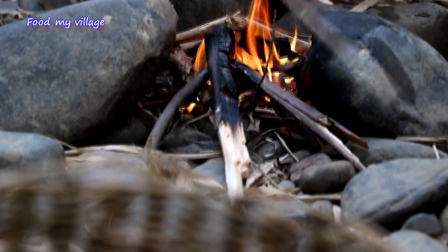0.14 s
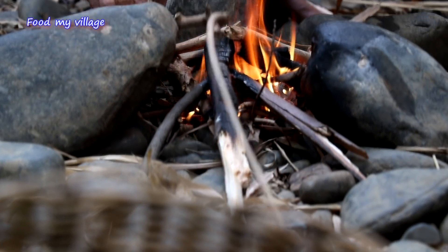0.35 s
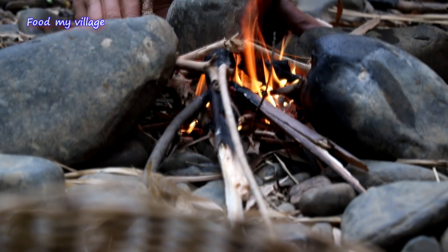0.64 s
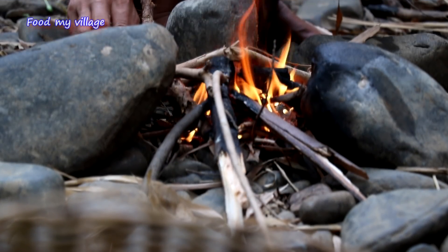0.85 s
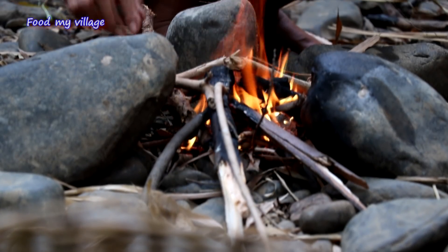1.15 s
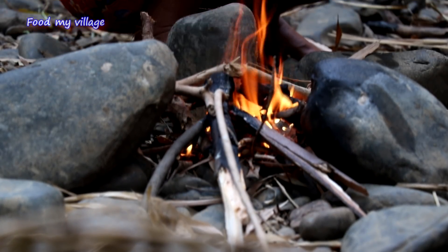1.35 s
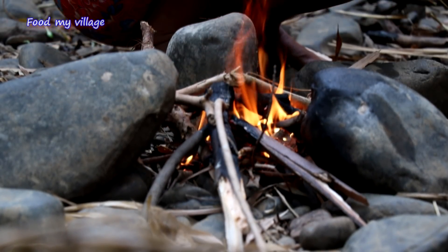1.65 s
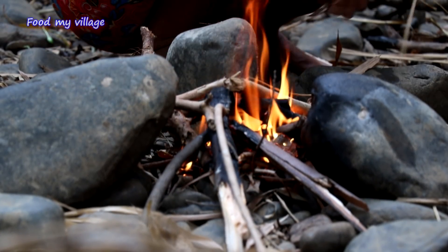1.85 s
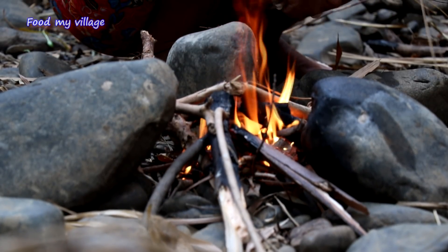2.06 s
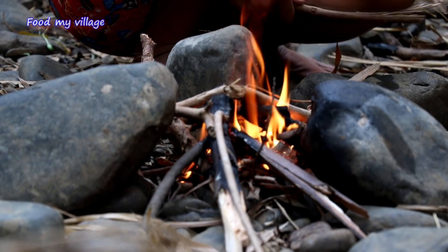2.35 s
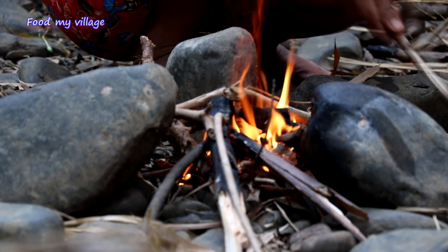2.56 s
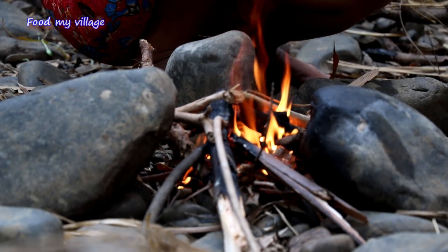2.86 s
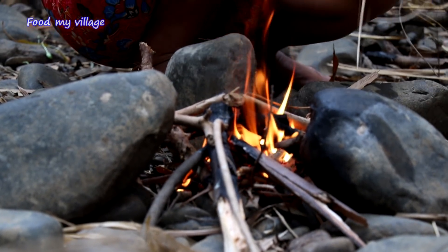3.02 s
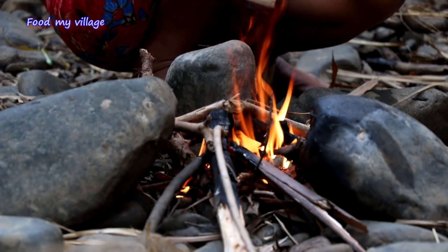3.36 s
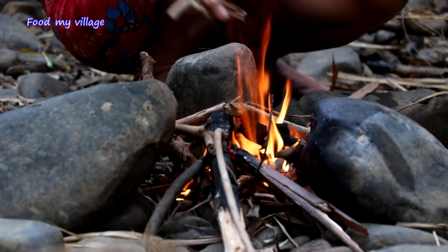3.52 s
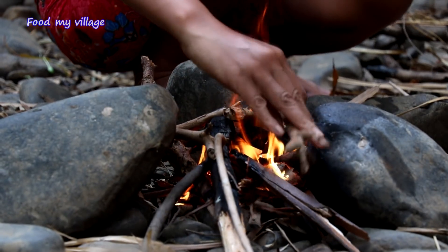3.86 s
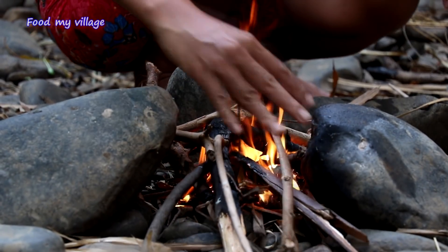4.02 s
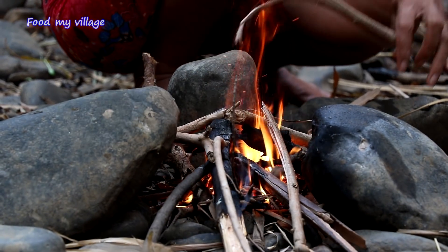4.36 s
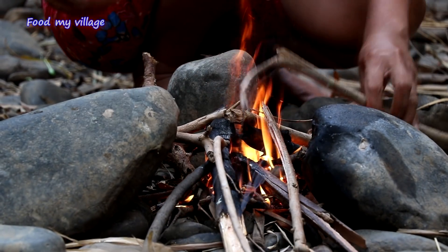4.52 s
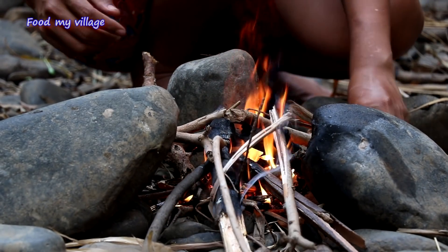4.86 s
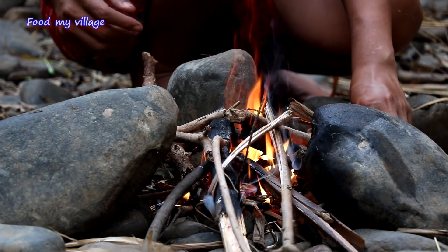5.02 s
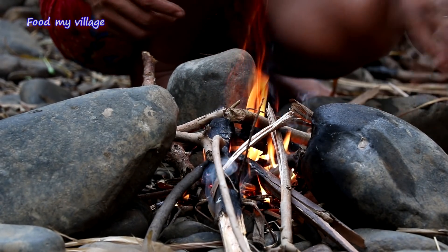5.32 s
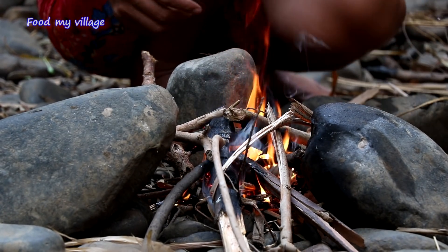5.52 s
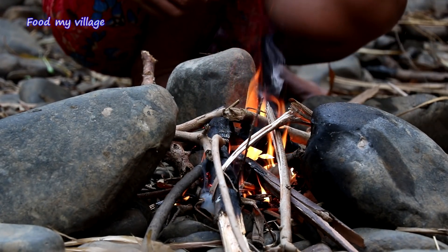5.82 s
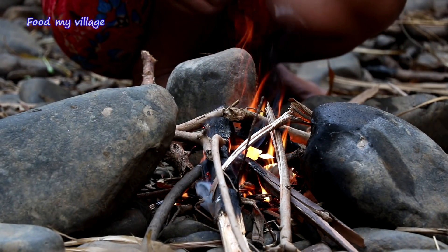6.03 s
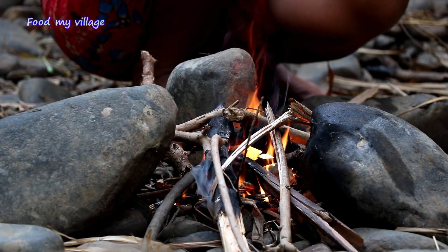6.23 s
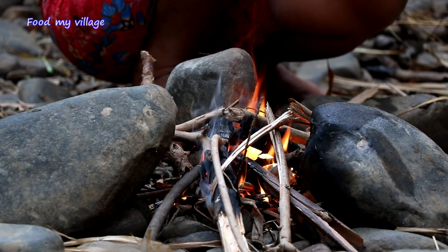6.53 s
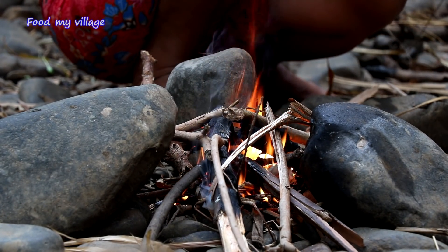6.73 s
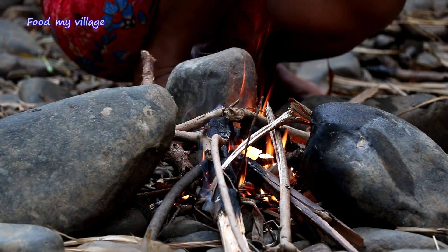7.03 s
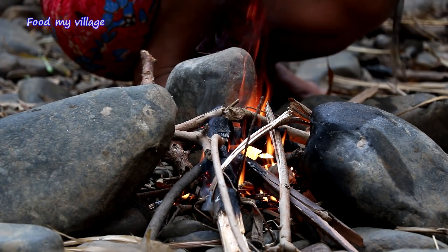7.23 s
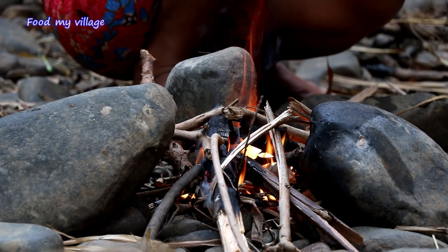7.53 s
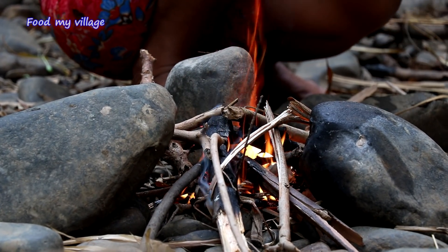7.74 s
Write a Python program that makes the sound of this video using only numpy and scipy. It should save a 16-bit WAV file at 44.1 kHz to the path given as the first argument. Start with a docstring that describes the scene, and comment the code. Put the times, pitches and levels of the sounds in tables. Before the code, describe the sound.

Outdoors, shrill cicadas and a faint, far engine hum lie behind a close little wood fire that fizzes and ticks. Loud sharp pops burst just after two seconds, followed by brief steamy spits. The cicadas dip in pitch and recover while sticks are laid on with soft knocks, and a distant bird gives a few faint notes. Another quick cluster of loud pops comes near the end, with more light wooden taps.

```python
"""A small stick fire burns close by between stones, outdoors. From the start sap fizzes, embers tick and
sticks knock softly, over droning cicadas and a far engine. Just after 2 s sap pockets burst with loud
pops, each ringing the wood and spraying steam; a distant bird calls, and again near 3 s and 5.4 s.
The cicadas sag in pitch from 2.6 s and recover by about 5 s. Near 7 s comes a second cluster of pops,
and more sticks are laid on."""
import sys
import numpy as np
from scipy import signal
from scipy.fft import rfft, irfft
from scipy.io import wavfile
from scipy.ndimage import uniform_filter1d, minimum_filter1d

SR = 44100
rng = np.random.default_rng(int(sys.argv[2]) if len(sys.argv) > 2 else 0)


def master_out(mix):
    """Clip the mix to full scale and print it as 16-bit PCM to the path in sys.argv[1]."""
    frames = np.transpose(np.atleast_2d(mix))
    ceiling = np.clip(frames, -1, 1)
    pcm = np.round(ceiling * 32767).astype(np.int16)
    wavfile.write(sys.argv[1], SR, pcm)


N = 347508
TIME = np.arange(N) / SR
HIT_SIZE = 8192  # samples in one impact

# sticks knocking together: start_s, level_db, brightness_db_per_octave, pitch_ratio
STICK_KNOCKS = [(0.089, -46, 0, 0.95), (.426, -49.5, 3.5, 0.84), (3.818, -48.5, -3.5, 0.8),
                (4.0225, -37.5, 2, 0.97), (4.707, -53, -2, 0.88), (6.42, -50.5, 0, 1.06),
                (6.938, -44, 9, .83), (7.091, -39.5, 5, 1.04), (7.167, -43, 7.5, 1.28),
                (7.419, -51, -3, 1.04)]


def undb(db):
    """Amplitude ratio of a level in decibels."""
    return 10 ** (np.asarray(db) / 20)


def unit(x):
    """Normalisation to rms 1."""
    return x / np.sqrt(np.mean(x ** 2))


def freqs(size):
    """Frequencies of a discrete spectrum, kept above zero."""
    return np.maximum(np.fft.rfftfreq(size, 1 / SR), 1)


def contour(points, size):
    """Magnitude response interpolated through (frequency_hz, level_db) points."""
    hz, db = np.transpose(points)
    return undb(np.interp(np.log(freqs(size)), np.log(hz), db))


def ringing(modes, pitch=1):
    """Modal response: damped resonances (centre_hz, width_hz, level_db) add in power."""
    f = freqs(HIT_SIZE)
    return np.sqrt(sum(undb(db) ** 2 / (1 + ((f * f - (hz * pitch) ** 2) / (f * width)) ** 2)
                       for hz, width, db in modes))


def colour(x, gain):
    """Minimum-phase filter: by causality it rings only after a blow."""
    cepstrum = irfft(np.log(gain + 1e-9), len(x))
    cepstrum[1:len(x) // 2] *= 2
    cepstrum[len(x) // 2 + 1:] = 0
    return irfft(rfft(x) * np.exp(rfft(cepstrum)), len(x))


def add(track, s, sound):
    """Superposition of a sound starting at s seconds."""
    start = max(int(s * SR), 0)
    track[start:start + len(sound)] += sound[:max(N - start, 0)]


def ease(start_s, takes_s):
    """Raised-cosine glide from 0 to 1."""
    return .5 - .5 * np.cos(np.pi * np.clip((TIME - start_s) / takes_s, 0, 1))


def narrow(width_hz, cycles=0, size=N):
    """Narrowband noise: a random envelope on a carrier of phase `cycles`; with none, a random drift."""
    bell = np.exp(-np.pi / 2 * (np.fft.fftfreq(N, 1 / SR) / width_hz) ** 2)
    envelope = np.fft.ifft(bell * (rng.standard_normal(N) + 1j * rng.standard_normal(N)))
    envelope *= np.sqrt(2 / np.mean(np.abs(envelope) ** 2))
    return (envelope[:size] * np.exp(2j * np.pi * cycles)).real


def hit(body, db, bright_db, ms):
    """Impulsive excitation: a broadband burst rings a body; db is its energy as if packed into 1 ms."""
    fade = np.exp(-np.arange(HIT_SIZE) / (SR * ms / 1000))
    phases = np.angle(rfft(rng.standard_normal(HIT_SIZE) * fade))
    burst = irfft(np.exp(1j * phases)) * np.sqrt(fade)
    octaves = np.log2(np.maximum(freqs(HIT_SIZE), 400))
    sound = colour(burst, body * undb(bright_db * (octaves - octaves.mean())))
    return sound * undb(db) * np.sqrt(SR / 1000 / np.sum(sound ** 2))


def reflect(x, first_ms, last_ms, db, count=10):
    """Early reflections: delayed copies, the later ones weaker, interfere with the direct sound."""
    out = x.copy()
    for k, chance in enumerate(rng.random(count)):
        ms = first_ms + (last_ms - first_ms) * (k + chance) / count
        add(out, ms / 1000, x * (-1) ** k * undb(db) * np.sqrt(first_ms / ms))
    return out


def tail(x, spectrum, t60_s, rise_s):
    """Diffuse decay: convolution with noise that builds up briefly and dies away exponentially."""
    t = TIME[:SR]
    response = rng.standard_normal(SR) * undb(-60 * t / t60_s) * (1 - np.exp(-t / rise_s))
    response = colour(response / np.sqrt(np.sum(response ** 2)), contour(spectrum, SR))
    return signal.fftconvolve(x, response)[:N]


def air(flutter_db=2.5, bands=16):
    """Ambient noise: a stereo hush whose middle bands flutter by independent amplitude modulation."""
    # open air, common to both channels: frequency_hz, density_db_per_hz
    mid_spectrum = [(12, -86.5), (22, -93), (60, -100), (150, -102), (260, -104), (500, -107.5),
                    (1000, -108), (2500, -111), (4000, -110), (9300, -111), (10500, -113.5), (15500, -116)]
    # the part that differs between left and right: frequency_hz, density_db_per_hz
    side_spectrum = [(15, -101.5), (80, -107), (500, -112), (2000, -116), (7000, -119), (14000, -116.5)]
    mid, side = (colour(rng.standard_normal(N), contour(points, N)) * np.sqrt(SR / 2)
                 for points in (mid_spectrum, side_spectrum))
    edges_hz = np.geomspace(200, 4400, bands + 1)
    f, spectrum = freqs(N), rfft(mid)
    for low, high in zip(edges_hz, edges_hz[1:]):
        band = irfft(spectrum * (f >= low) * (f < high), N)
        mid += band * (undb(flutter_db * narrow(16)) - 1)
    return np.array([mid + side, mid - side])


def engine(firing_hz=14.67):
    """Periodic firings make a harmonic series; only low harmonics carry this far, scrambled in phase."""
    # distant engine: harmonic_number, level_db
    harmonics = [(2, -89), (3, -99.5), (4, -80.5), (5, -80.5), (6, -90), (7, -88.5), (8, -78), (9, -86),
                 (10, -77.5), (11, -80), (12, -95), (15, -88.5)]
    phase = 2 * np.pi * firing_hz * TIME + .03 * narrow(2)
    return np.sqrt(2) * sum(undb(db) * np.cos(k * phase + rng.standard_normal()) for k, db in harmonics)


def bird():
    """Frequency-modulated noise: hoarse notes glide and level off, the higher ones wider in bandwidth."""
    # distant bird notes: start_s, length_s, start_hz, end_hz, level_db
    notes = [(2.308, 0.083, 1370, 1440, -67.5), (2.96, 0.28, 640, 823, -74), (5.41, 0.183, 2130, 2020, -73)]
    out = np.zeros(N)
    for s, length, start_hz, end_hz, db in notes:
        arc = np.linspace(0, np.pi, int(length * SR))
        hz = start_hz + (end_hz - start_hz) * np.sin(arc / 2)
        width_hz = 90 * (start_hz / 1000) ** 1.6
        note = narrow(width_hz, np.cumsum(hz) / SR, len(arc))
        add(out, s, undb(db) * np.sqrt(np.abs(np.sin(arc))) * unit(note))
    return out


def cicadas(click_hz=425, gain_db=-1.14, drift_db=0.02, waver_db=0.44):
    """Many tymbals sum incoherently into shrill resonances, which glide down while the song slackens."""
    # tymbal resonances in full and slack song: full_hz, slack_hz, width_hz, full_db, slack_db
    resonances = [(4810, 4720, 350, -78, -68), (5385, 5150, 394, -66, -68), (5830, 5520, 290, -69, -71.5),
                  (6190, 5950, 480, -71, -64), (6910, 6750, 700, -66.5, -66),
                  (7630, 7330, 440, -67.5, -70.5), (7980, 7950, 280, -68.5, -80),
                  (8410, 8400, 1000, -71.5, -74.5)]
    # one insect flaring above the drone: centre_s, half_length_s, pitch_hz, width_hz, level_db
    flare = (1.36, 0.04, 7300, 900, -58.5)
    s, half, hz, width_hz, db = flare
    song = undb(db) * np.exp(-((TIME - s) / half) ** 2) * narrow(width_hz, hz * TIME)
    slack = ease(start_s=2.6, takes_s=.82) - ease(start_s=4.2, takes_s=.96)
    for full_hz, slack_hz, width_hz, full_db, slack_db in resonances:
        cycles = np.cumsum(full_hz + slack * (slack_hz - full_hz)) / SR
        song += undb(full_db + slack * (slack_db - full_db)) * narrow(width_hz, cycles)
    clicking = 1 + 0.12 * narrow(49.1, click_hz * TIME)
    return song * clicking * undb(gain_db + drift_db * narrow(0.99) + waver_db * narrow(14))


def fizz(bubbles_per_s=1100, simmer_db=-77, stir_db=-65, stir_s=0.032, puff_s=0.0015, hiss_onset_db=-46):
    """Shot noise: countless sap bubbles burst inside the wood, each with a click and a brief puff."""
    # sap boiling up: centre_s, half_length_s, level_db
    swells = [(0.996, 0.02, -59), (1.275, 0.083, -65), (1.894, .05, -65.5), (2.557, 0.031, -50.5),
              (2.757, 0.025, -56.5), (4.04, .032, -65), (5.784, 0.051, -59.5), (6.027, 0.15, -65.5),
              (7.193, .08, -67.5), (7.774, 0.035, -59)]
    sizes = undb(4 * np.minimum(rng.exponential(size=N), 5))
    clicks = (rng.random(N) < bubbles_per_s / SR) * sizes * rng.choice([-1, 1], N)
    pole = np.exp(-1 / (puff_s * SR))
    puffs = np.sqrt(signal.lfilter([1 - pole], [1, -pole], clicks ** 2)) * rng.standard_normal(N)
    power = undb(simmer_db + 3 * narrow(5)) ** 2
    power += sum(undb(db) ** 2 * np.exp(-((TIME - s) / half) ** 2) for s, half, db in swells)
    for s, *_ in STICK_KNOCKS:  # every knock stirs the embers
        add(power, s, undb(stir_db) ** 2 * np.exp(-TIME[:SR] / stir_s))
    # bubbling: frequency_hz, level_db
    spectrum = [(200, -11.5), (900, -3.5), (2200, -1), (3400, 3), (6000, 6), (12000, -5.5), (15500, -7)]
    bubbles = unit(colour(undb(-5) * clicks + puffs, contour(spectrum, N)))
    # under high pressure the bubbling turns into a thin hiss
    hiss = unit(colour(puffs, contour([(2000, -18), (6000, -7), (11000, 0), (15500, -2.5)], N)))
    hiss_share = power / (power + undb(hiss_onset_db) ** 2)
    return np.sqrt(power) * (np.sqrt(1 - hiss_share) * bubbles + np.sqrt(hiss_share) * hiss)


def knocks(firm_db=-36, firm_contact_ms=1.22):
    """Impacts excite the modes of loose sticks; stones and ground answer with one damped note."""
    # resonances of a loose stick: centre_hz, width_hz, level_db
    stick_modes = [(417, 270, -22), (1210, 420, -7), (2290, 99, 0), (3410, 360, -6.5), (4480, 190, -7)]
    # soft bumps on stones and ground: start_s, level_db, pitch_hz, contact_ms
    bumps = [(4.026, -53.5, 370, 34), (4.260, -57.5, 285.3, 51), (5.062, -58, 290, 11),
             (5.425, -59, 264, 15), (7.660, -50, 673, 5.4), (7.661, -54, 400, 3.8), (7.755, -58, 387, 5.4),
             (7.860, -55.5, 230, 12)]
    out = np.zeros(N)
    bark = contour([(5500, -2), (8500, -7)], HIT_SIZE)  # soft bark absorbs the treble
    for s, db, bright_db, pitch in STICK_KNOCKS:
        contact_ms = firm_contact_ms * 2 ** ((firm_db - db) / 6)  # softer touches last longer
        add(out, s, hit(ringing(stick_modes, pitch) * bark, db, bright_db, contact_ms))
    for s, db, hz, contact_ms in bumps:
        ground = ringing([(hz, hz * 0.36, 0)]) ** 2
        add(out, s, hit(ground, db, 0, contact_ms))
    return out


def ticks(faint_per_s=2.7):
    """Brittle fracture: heavily damped flakes of char snap, a few clearly, more faintly at random."""
    # clear ember ticks: start_s, level_db, brightness_db_per_octave
    clear = [(.0930, -44, -6), (.62, -54.5, -3.5), (1.2635, -43.5, -2), (2.4046, -46.5, -2.5),
             (2.9255, -47.5, 3.5), (5.2252, -51, 5), (5.8198, -46, -3.5), (6.8660, -47, 1),
             (7.358, -50, 11), (7.5890, -46.5, 2), (7.674, -41.5, -1)]
    faint = [(rng.random() * N / SR, rng.normal(-61, 3.5), rng.normal(0, 4))
             for _ in range(int(faint_per_s * N / SR))]
    char = ringing([(3880, 1300, -0.44), (11700, 5800, -1.6)])
    out = np.zeros(N)
    for s, db, bright_db in clear + faint:
        add(out, s, hit(char, db, bright_db, ms=0.8))
    return out


def pops(lead_db=-17, lead_s=0.00066, jet_blur=2.23, spit_spray_db=-9):
    """Sudden pressure release: sap pockets crack the wood, ring its modes and spray steam."""
    # bursting sap pockets: start_s, level_db, brightness_db_per_octave, fracture_ms,
    # relative_spray_db, pitch_ratio, low_cut_hz
    pockets = [(2.152, -17.5, 1, 0.99, -1.5, 1.04, 2100), (2.199, -32.5, 3.5, 1.8, -1, 0.89, 2200),
               (2.2203, -4, -1, 2.8, -.5, 1, 120), (2.6021, -32, -4, 3.6, 2, 1.11, 300),
               (2.728, -42, 8, 4, 0, .7, 1800), (2.7629, -39.5, 1.5, 2.83, -3.5, .92, 1500),
               (6.969, -16.5, -1, 1.8, -3, 1.104, 600), (6.9793, -28, -2.5, 1, 11.5, 1.1, 1400),
               (6.9846, -19, 3, .63, -0.5, .92, 1600), (6.9914, -19, -0.5, 3.2, -7, 1.1, 550),
               (6.9948, -22, -2, .87, -10, .954, 600)]
    # thin spits of steam from a split in the bark: start_s, level_db
    spits = [(2.5406, -29.5), (2.553, -34), (2.5579, -25.5), (2.5626, -27.5), (2.5673, -21.5), (2.570, -29)]
    # resonances of the burning wood: centre_hz, width_hz, level_db
    wood_modes = [(950, 180, -20.5), (1400, 250, -19.5), (2300, 410, -12), (2880, 290, -7), (3400, 140, -3),
                  (3690, 120, -2), (3690, 33, -4), (4480, 230, -4.5), (4938, 240, 0), (5450, 260, -3),
                  (5720, 93, -3), (6700, 930, -18), (8150, 2000, -15), (10035, 120, -9),
                  (12160, 2400, -13.5), (15000, 1200, -22)]
    # the ground beneath, reached only by the deepest pops: centre_hz, width_hz, level_db
    ground_mode = (330, 125, -28)
    # colour of the steam spray: frequency_hz, gain_db
    spray_spectrum = [(150, -13.5), (900, -12.5), (2200, -12), (3700, -8.5), (5000, -11.5), (7000, -1),
                      (10000, -2.5), (15000, -6)]
    cracks, steam = np.zeros(N), np.zeros(N)
    # the jet only brushes the wood, so its resonances are blurred
    jet = ringing([(hz, width * jet_blur, mode_db) for hz, width, mode_db in wood_modes])
    for s, db, bright_db, ms, spray_db, pitch, low_cut_hz in pockets:
        modes = [(hz * pitch, width, mode_db) for hz, width, mode_db in wood_modes] + [ground_mode]
        wood = ringing(modes) / np.hypot(1, (low_cut_hz / freqs(HIT_SIZE)) ** 3)
        add(cracks, s - lead_s, hit(wood, db + lead_db, bright_db, ms))  # fibres give way first
        add(cracks, s, hit(wood, db, bright_db, ms))
        add(steam, s, hit(jet, db + spray_db, bright_db, ms=0.089))
    for s, db in spits:
        spit = hit(jet, db, bright_db=14.5, ms=1.8)
        add(cracks, s, spit)
        add(steam, s, spit * undb(spit_spray_db))
    cracks = reflect(cracks, first_ms=1.6, last_ms=9, db=-19)
    return cracks + tail(steam, spray_spectrum, t60_s=0.19, rise_s=.005)


def scene():
    """Scattering and reverberation: stones scatter the fire, dead ahead; the surroundings echo faintly."""
    # echo from stony ground and trees: frequency_hz, gain_db
    echo_spectrum = [(150, -18), (1400, -24), (3500, -27.5), (5000, -26), (8000, -22.5), (15000, -31.5)]
    bursts = pops()
    taps = reflect(ticks() + knocks(), first_ms=2.4, last_ms=12, db=-14.5)
    scatter = tail(taps, [(300, 1), (3000, -12.5), (12000, -19.5)], t60_s=0.12, rise_s=0.002)
    fire = bursts + taps + scatter + fizz()
    echo = tail(fire, echo_spectrum, t60_s=0.69, rise_s=0.01)
    # trunks and ground comb-filter the cicadas' song into fine steady lines
    song = reflect(cicadas(), first_ms=7, last_ms=36, db=-12, count=14)
    return fire + echo + song + bird() + engine() + air()


def record(dry, ceiling=.93, hold_samples=41, top_hz=15900):
    """Peak and band limiting: the recorder briefly ducks any peak over its ceiling and cuts the top."""
    gain = ceiling / np.maximum(np.abs(dry).max(axis=0), ceiling)
    gain = uniform_filter1d(minimum_filter1d(gain, hold_samples), hold_samples)
    lowpass = signal.ellip(8, .1, 50, top_hz, fs=SR, output="sos")
    return signal.sosfiltfilt(lowpass, dry * gain)


dry = scene()
out = record(dry)
master_out(out)
```